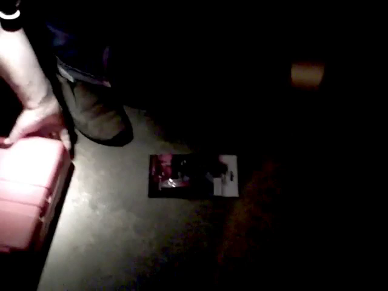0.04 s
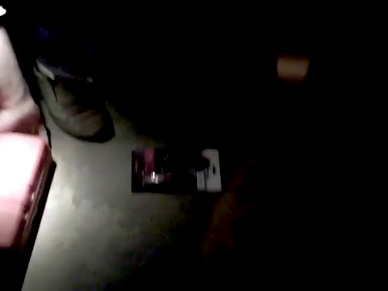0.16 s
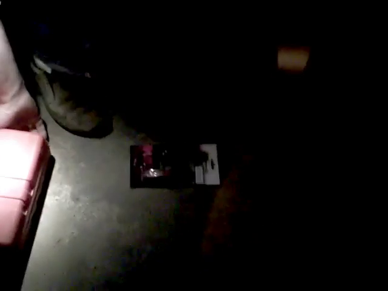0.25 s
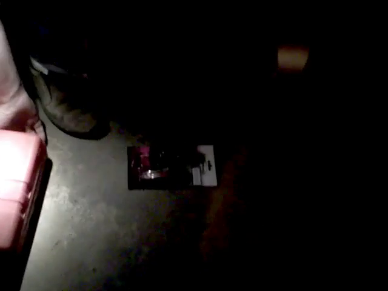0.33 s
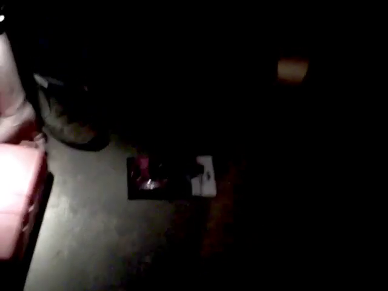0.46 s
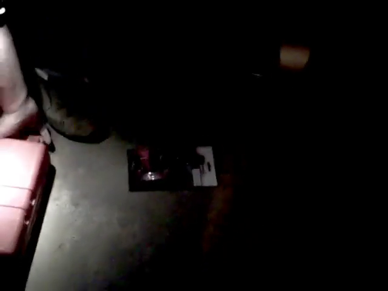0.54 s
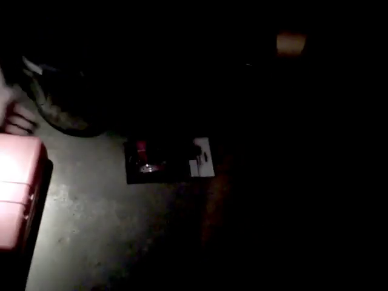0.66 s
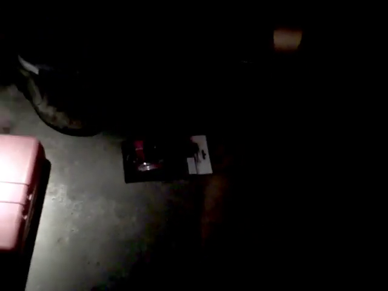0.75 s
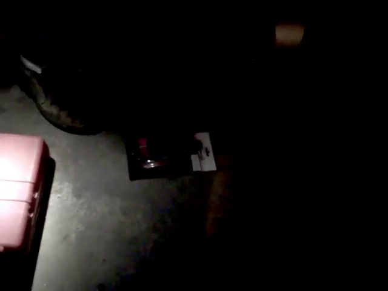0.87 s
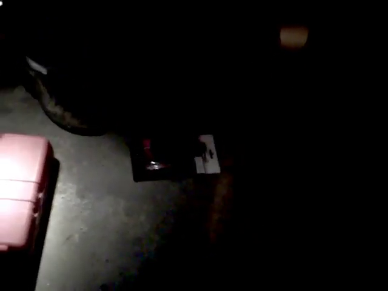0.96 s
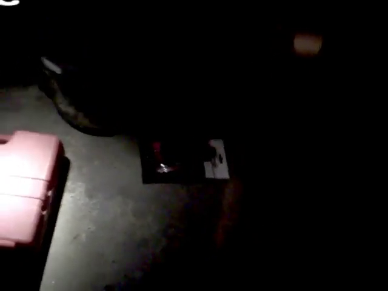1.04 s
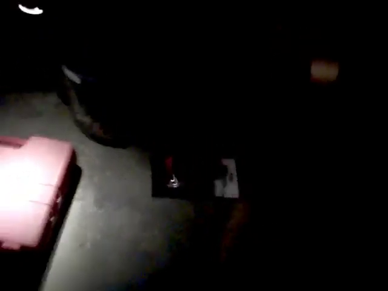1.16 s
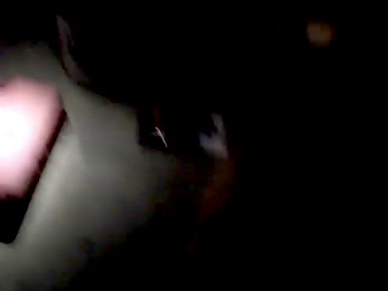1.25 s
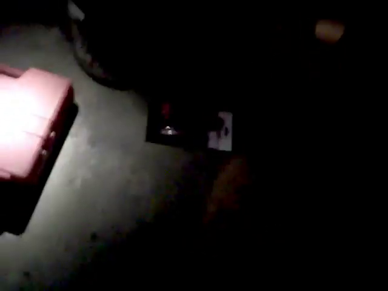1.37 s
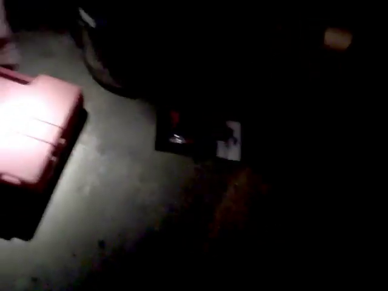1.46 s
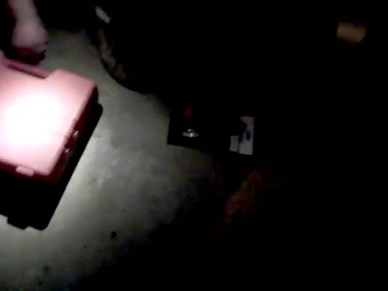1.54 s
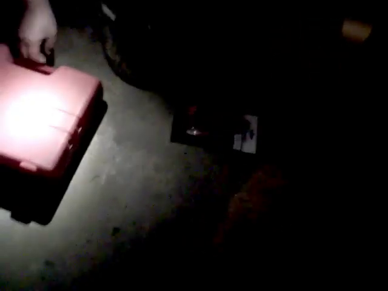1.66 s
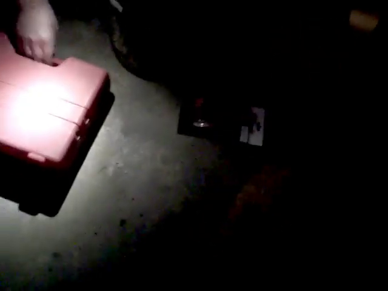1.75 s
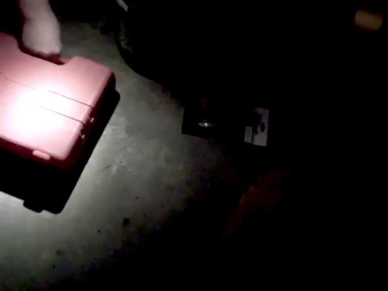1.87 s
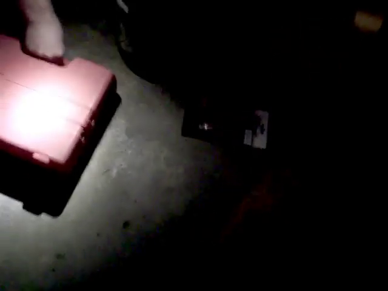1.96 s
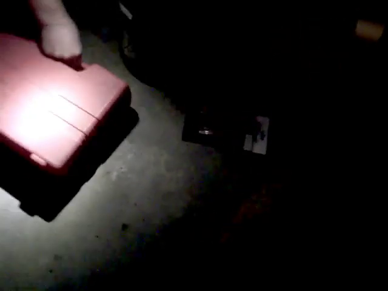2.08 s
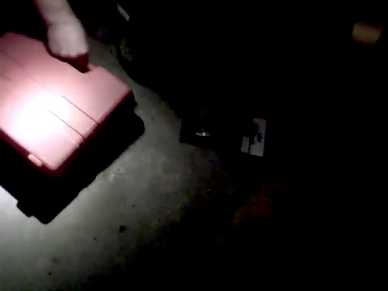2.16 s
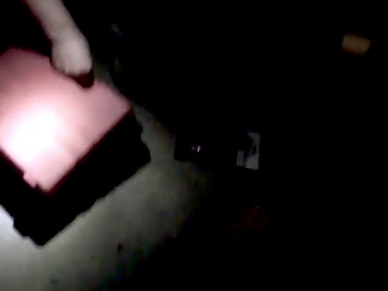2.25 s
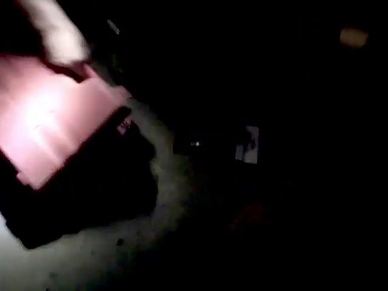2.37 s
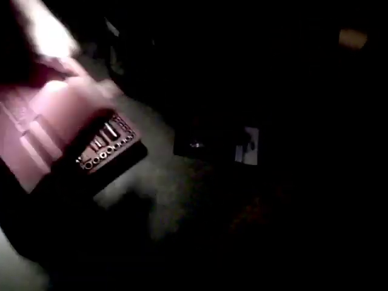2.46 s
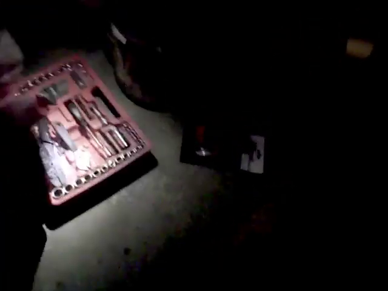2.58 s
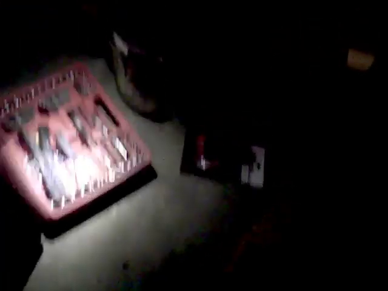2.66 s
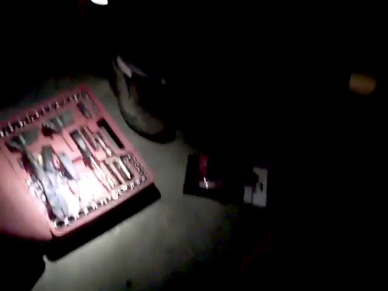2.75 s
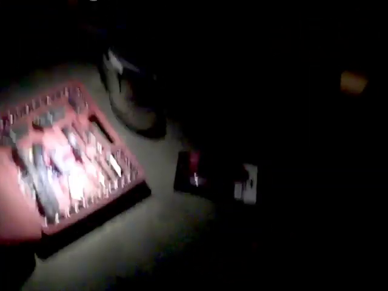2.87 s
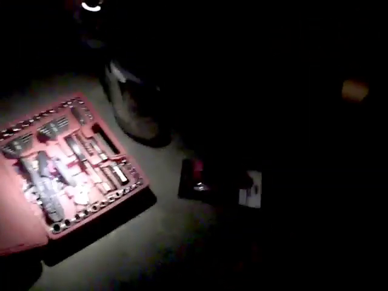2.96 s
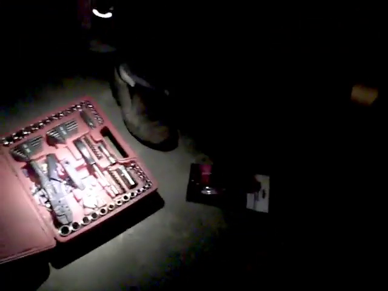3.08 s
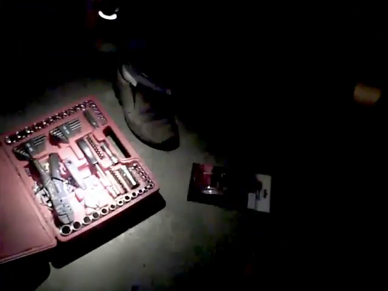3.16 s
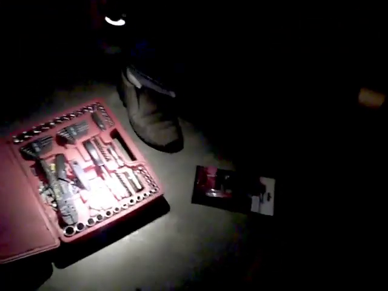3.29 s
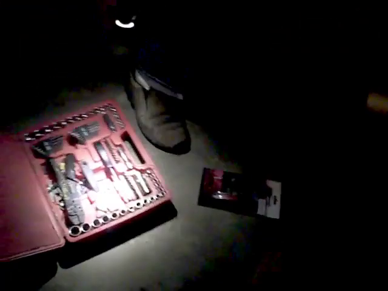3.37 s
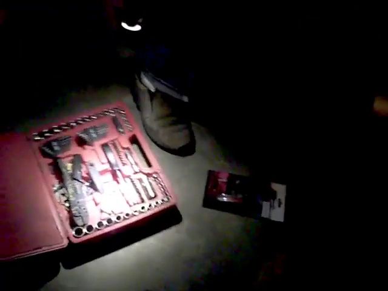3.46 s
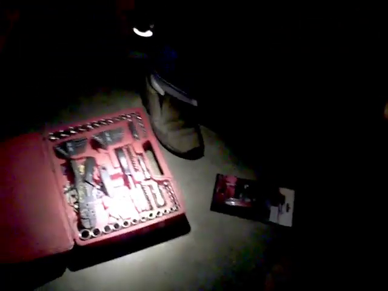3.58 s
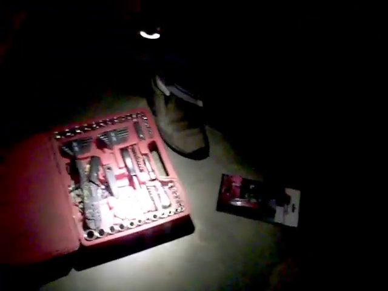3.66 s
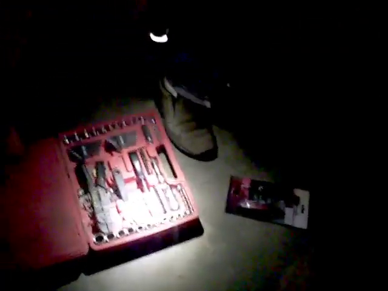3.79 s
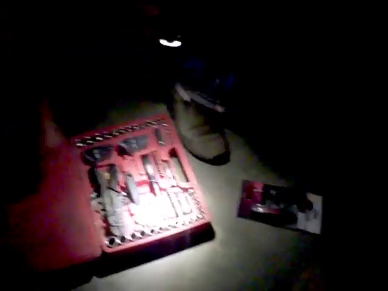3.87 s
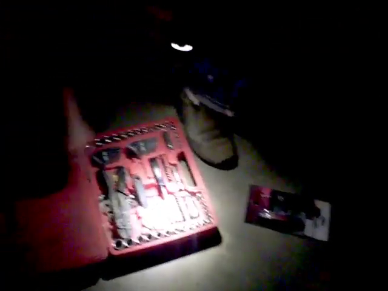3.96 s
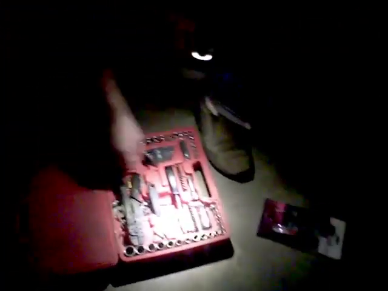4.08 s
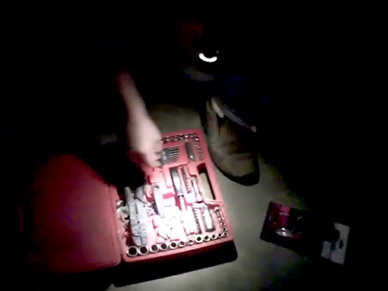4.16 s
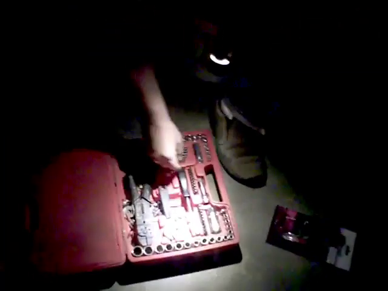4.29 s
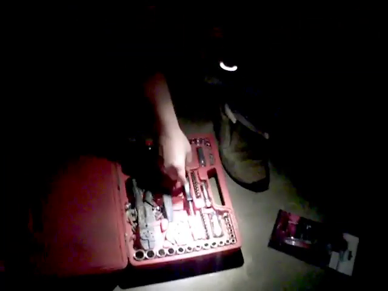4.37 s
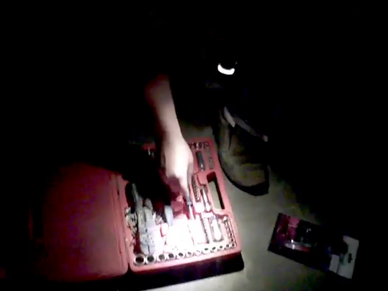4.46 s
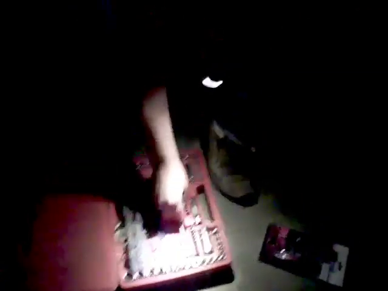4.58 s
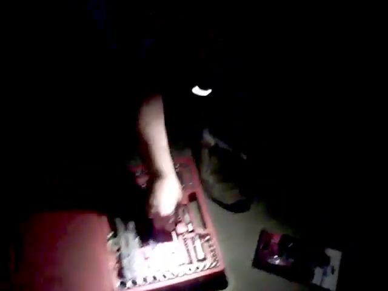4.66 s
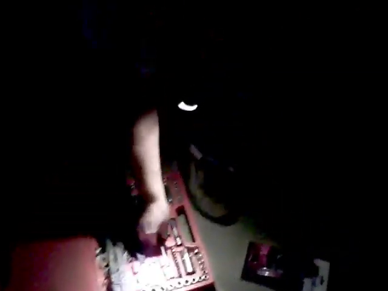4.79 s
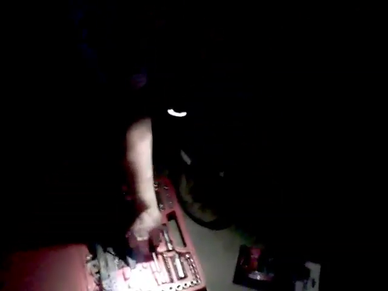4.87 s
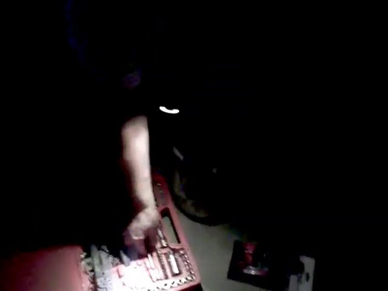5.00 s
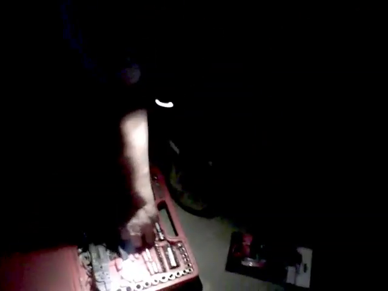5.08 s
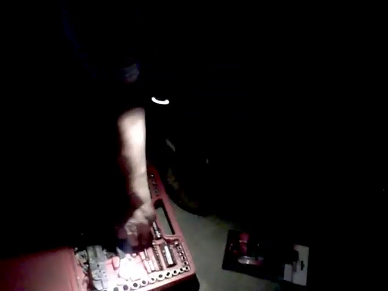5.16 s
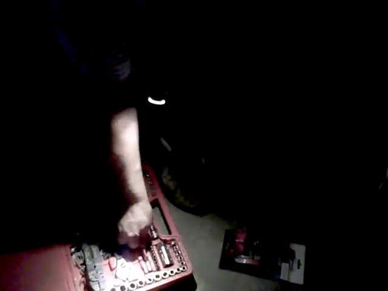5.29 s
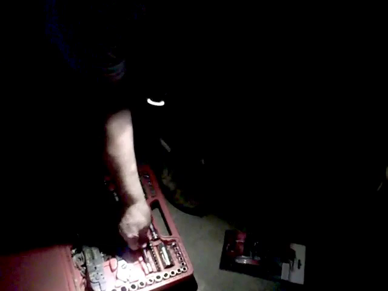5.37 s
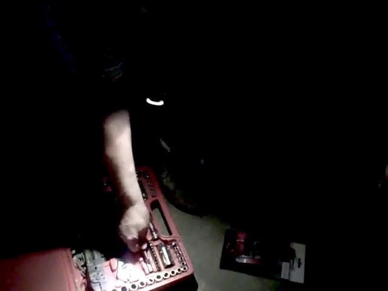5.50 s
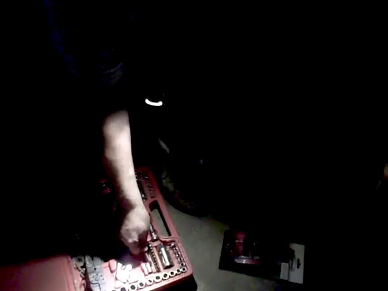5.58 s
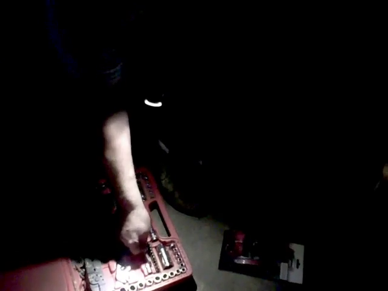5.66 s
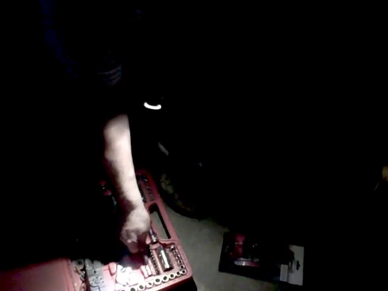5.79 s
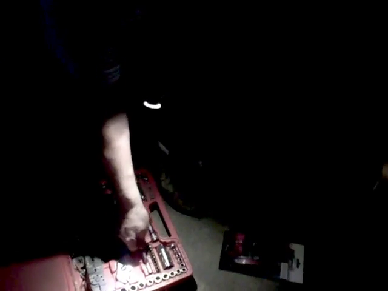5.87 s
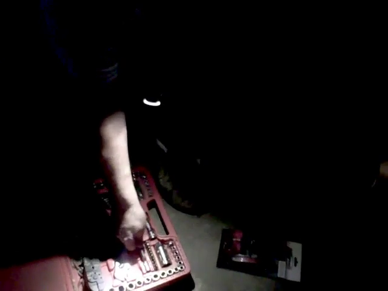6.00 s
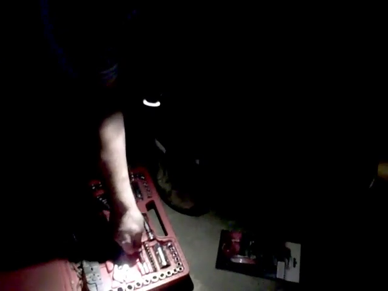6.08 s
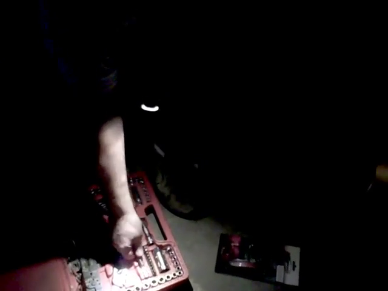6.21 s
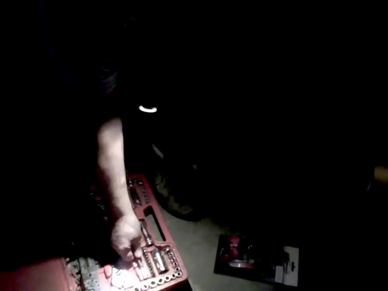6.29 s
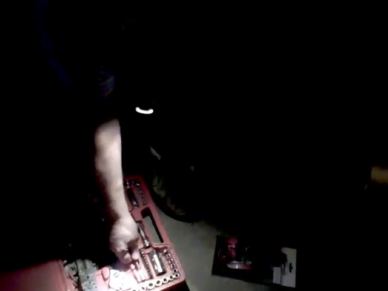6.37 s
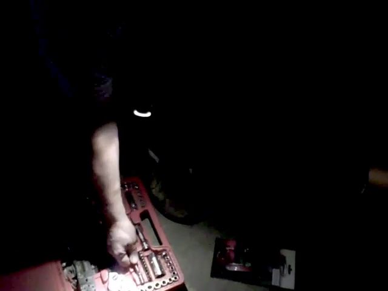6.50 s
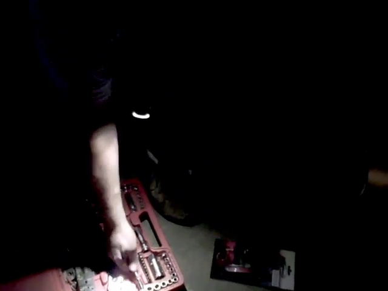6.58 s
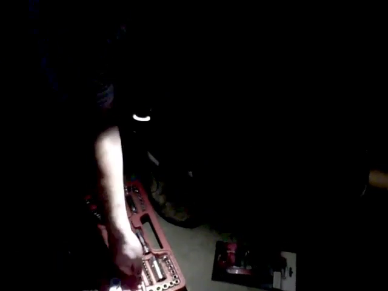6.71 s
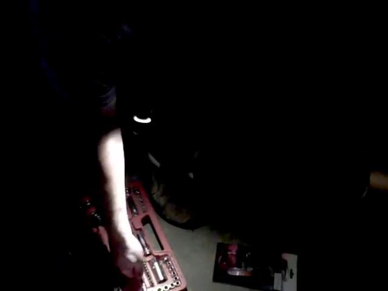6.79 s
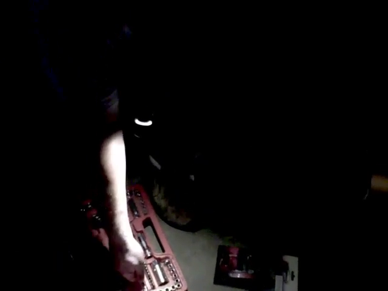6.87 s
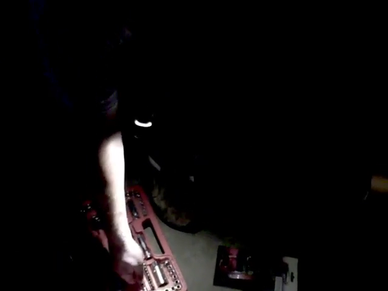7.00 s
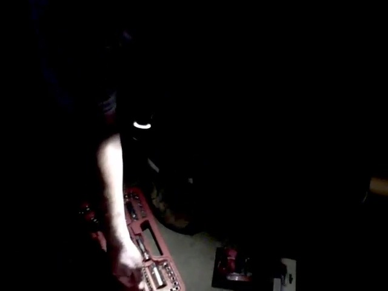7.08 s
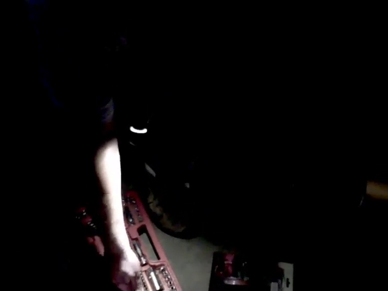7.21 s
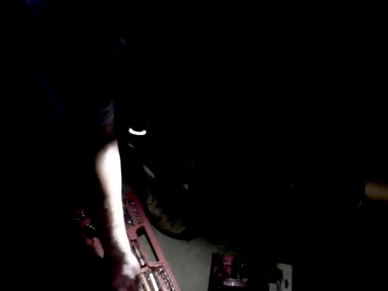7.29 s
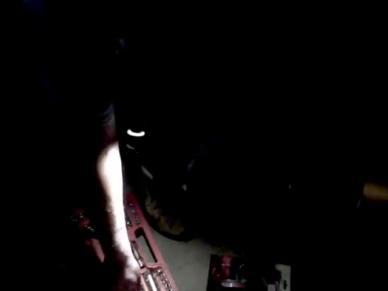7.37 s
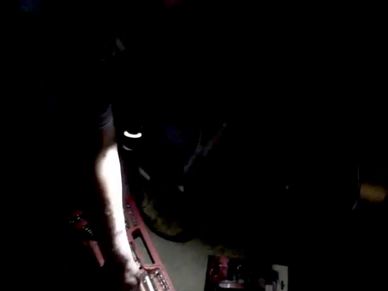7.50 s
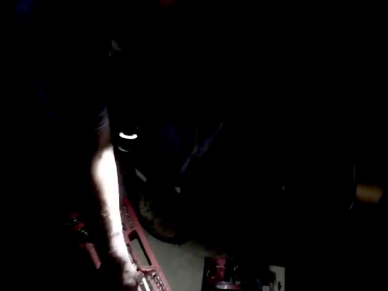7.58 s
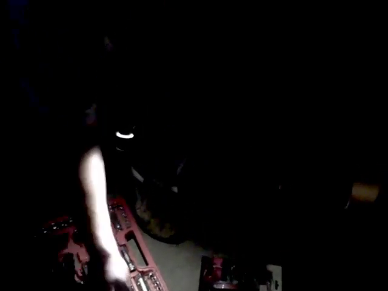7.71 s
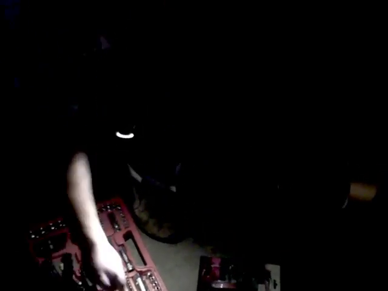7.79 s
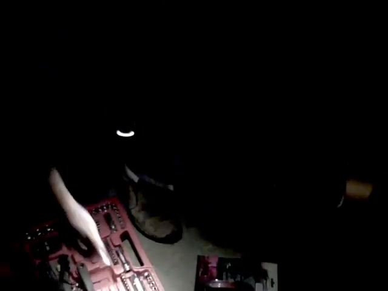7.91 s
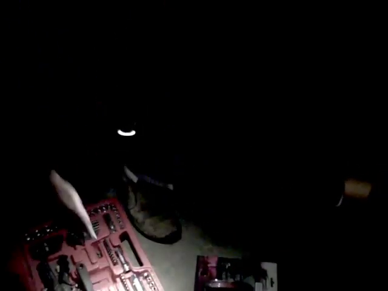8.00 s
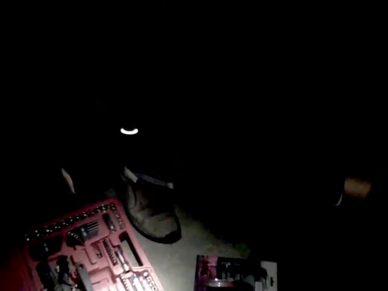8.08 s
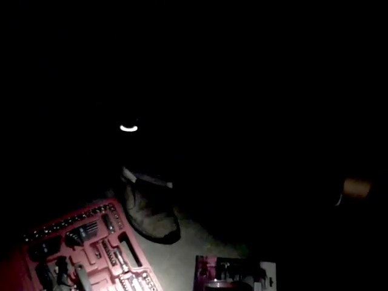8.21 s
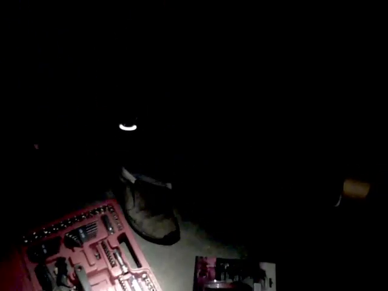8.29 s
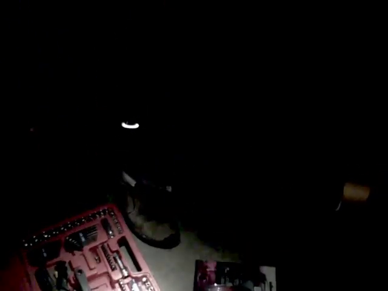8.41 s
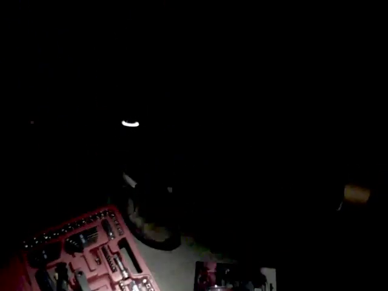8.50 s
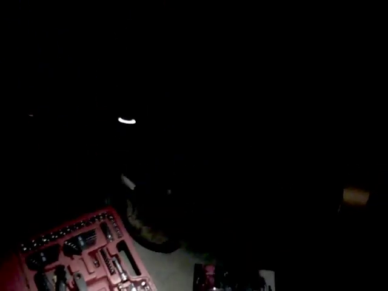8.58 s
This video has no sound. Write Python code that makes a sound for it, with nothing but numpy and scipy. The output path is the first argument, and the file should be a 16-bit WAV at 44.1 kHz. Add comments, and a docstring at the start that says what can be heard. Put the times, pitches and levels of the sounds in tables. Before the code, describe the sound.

A quiet bare garage with faint steady air noise and a short diffuse echo. Soft rubbing and tiny taps open the scene, then at about 0.5 s a hollow plastic case lands with a loud, rattling double bang. Around 1.1-1.4 s come dry close finger taps, one prominent at 1.28 s, and gritty latch clicks. At 2.0 s the case is shoved over concrete with a scrape and jingling sockets; a second short shove leads into a clattering crash at 2.25-2.35 s. A sharp plastic snap follows at 2.6 s, a stuttering hinge creak at 2.8-3.0 s, then sleeve rustle, and the lid slams with a deep, loud bang near 3.7 s. It becomes much quieter; from 5.1 to 7.8 s light, irregular clacks and faint steel clinks mark tools being worked from plastic seats. The end is almost silent.

```python
"""Bare garage: a blow-moulded socket case is unlatched, dragged round on concrete and dropped open.
The lid creaks over and slams, tools rattling inside; then a hand pries steel tools from plastic seats.
Sleeves rustle and fingers tap close by.
Blows: grain bursts through shell resonances. Steel: damped modes. Creak: stick-slip impulses.
Friction: filtered grains under gain curves. A diffuse decaying noise tail is the room."""
import sys
import numpy as np
from scipy import signal
from scipy.fft import rfft, irfft, next_fast_len
from scipy.io import wavfile
from scipy.ndimage import uniform_filter1d

SR = 44100
rng = np.random.default_rng(int(sys.argv[2]) if len(sys.argv) > 2 else 0)


def persist_wave(psi):
    """Save psi, clipped to +-1, as 16-bit WAV."""
    counts = np.round(np.clip(psi, -1, 1) * 32767).astype(np.int16)
    wavfile.write(sys.argv[1], SR, np.atleast_2d(counts).T)


N = 381465
TIME = np.arange(N) / SR
AFTER = np.arange(SR // 4) / SR  # s since a contact


# case or lid lands on the floor: [t/s, level/dB, thump/dB, crack/dB, spot f/Hz, rattle t60/s]
SLAMS = [(0.515, -13.5, -16, -10, 1159, 0.084), (0.550, -9, -18, -20.5, 790, 0.027),
         (2.253, -7.5, -21.5, -8, 1505, 0.06), (2.295, -14.5, -22, -13.5, 1300, 0.4),
         (2.357, -13.5, -11.5, -18, 881, 0.042), (3.673, -8, -4, -5.5, 430, 0.067),
         (3.697, -11.5, -8.5, -18.5, 470, 0.12), (3.735, -8, -24, -11, 1773, 0.069)]
FAR_EDGE_S, FAR_EDGE_DB, FAR_EDGE_THUMP_DB = .0105, -2.5, 0.5  # lands later, weaker, heavier


def slams():
    """The case lands on one edge, then the other, and its sockets chatter in their seats."""
    edges = [(0, 0, 0), (FAR_EDGE_S, FAR_EDGE_DB, FAR_EDGE_THUMP_DB)]
    out = np.zeros(N)
    for s, db, thump_db, crack_db, spot_hz, t60 in SLAMS:
        for late_s, edge_db, heavier_db in edges:
            force = grains(len(AFTER), 12000, 2) * fade(t60) * (1 - fade(0.0095))
            hit = blow(force, thump_db + heavier_db, crack_db, spot_hz, wet_db=-4.0)
            add(out, s + late_s, amp(db + edge_db) * hit)
    return out


# latches, lid, case corners: [t/s, level/dB, thump/dB, crack/dB, spot f/Hz, chatter t60/s]
KNOCKS = [(0.461, -31, 0, -12.5, 540, .06), (0.477, -28.5, -12, -13.5, 860, .13),
          (1.32, -42, -11, -1.5, 1610, .06), (1.361, -25, -33, -16, 930, .022),
          (1.368, -27.5, -20, -22, 930, .02), (1.49, -40.5, 1.5, -5.5, 567, .03),
          (1.75, -30.5, -28, -13.5, 790, .04), (1.906, -31, -18, -11, 746, .045),
          (1.973, -40, 1.5, 2, 790, .035), (2.0, -50, 7, 9, 515, .02), (2.194, -24, -32, -7.5, 890, .04),
          (2.207, -25, -23, -2, 915, .045), (2.549, -24.5, -19, -13.5, 500, .07),
          (2.578, -31.5, -14, 1.5, 1440, .045), (2.648, -36, -8, 4, 1820, .046),
          (3.664, -23.5, -3.5, -13, 1090, .056), (4.154, -50.5, 1.5, -33, 480, 0.082)]


def knocks():
    """Short gritty contacts of the plastic parts, with an onset of a few ms at most."""
    out = np.zeros(N)
    bite = 1 - fade(.004)
    for s, db, thump_db, crack_db, spot_hz, t60 in KNOCKS:
        force = grains(len(AFTER), 7000, 2.5) * fade(t60) * bite
        add(out, s, amp(db) * blow(force, thump_db, crack_db, spot_hz, wet_db=-0.44))
    return out


# tools in and out of their seats: [t/s, level/dB, thump/dB, crack/dB, seat f/Hz]
CLACKS = [(5.145, -38.5, -4, -6.5, 1990), (5.186, -29, -31, -12, 1900), (5.213, -33, -13, -14.5, 697),
          (5.239, -38, -23, -5, 1610), (5.292, -40.5, -8.5, -23, 1030), (5.53, -46, -3, -7.5, 640),
          (5.977, -39, -21, 5, 2520), (6.105, -44, -10, -3, 1403), (6.148, -53, 5.5, -15, 353),
          (6.551, -44.5, -7.5, -17, 1030), (6.656, -38, -28, -9, 680), (6.667, -34.5, -23.5, -17.5, 640),
          (6.701, -41, -9, -5.5, 640), (6.727, -28.5, -20, -20.5, 1060), (6.899, -39.5, -15.5, -21, 664),
          (6.916, -44, -14, -3.5, 1020), (7.08, -41, -19, -18, 884), (7.634, -48, -9.5, -13, 657),
          (7.67, -46.5, -21.5, -11, 894), (7.701, -38, -13, -29, 1080), (7.752, -48.5, -12, -20.5, 829)]
# modes of a hand-damped steel tool: [f/Hz, level/dB, t60/s]
TOOL_MODES = [(2280, 0.5, 0.016), (3068, 0.5, .012), (5300, 9.5, 0.0074), (6850, 3, 0.0091)]
CLACK_T60_S = 0.046
TOOL_RING_DB = -0.5  # re crack
TOOL_SPREAD = 0.0866  # std of log pitch


def clacks():
    """A tool strikes its plastic seat; the steel rings more the stronger the crack."""
    out = np.zeros(N)
    bite = 1 - fade(.004)
    for s, db, thump_db, crack_db, spot_hz in CLACKS:
        force = grains(len(AFTER), 5000, 2.3) * fade(CLACK_T60_S) * bite
        pitch = np.exp(TOOL_SPREAD * rng.standard_normal())
        steel = steel_ring([(pitch * hz, level, t60) for hz, level, t60 in TOOL_MODES])
        add(out, s, amp(db) * blow(force, thump_db, crack_db, spot_hz, wet_db=-3))
        add(out, s, amp(db + crack_db + TOOL_RING_DB) * garage(steel, wet_db=-2))
    return out


# plastic spectrum: [f/Hz, level/dB]
PLASTIC = [(25, -27.5), (90, -36.5), (130, -21.5), (175, -9), (255, -1.5), (400, -4), (800, 0),
           (1700, -5.5), (3100, -9), (4000, -9.5), (6000, -11.5), (9000, -21.5), (12500, -33),
           (16000, -32.5)]
# resonances of the hollow case: [f/Hz, width/Hz, gain/dB]
SHELL = [(180, 27, 8.5), (308.3, 40, 10.5), (373, 27, 5), (431, 24, 6.5), (490, 15, 6), (542, 26, 4.5),
         (680, 24, 5.5), (817, 12, 7), (934, 11, 5.5), (1030, 28, 6), (1165, 32, 5), (1390, 9.8, 7.5),
         (1613, 110, 4.5), (1890, 35, 6)]


def blow(force, thump_db, crack_db, spot_hz, wet_db):
    """A brief force shakes shell and room; thump and crack levels are relative to the body."""
    heard = amp(wet_db) * np.linalg.norm(force) * tail()
    add(heard, 0, force)
    spot = (spot_hz, spot_hz / 2, 4)  # broad local resonance
    shell = coloured(heard, PLASTIC, SHELL + [spot])
    thump = crest(band(shell, 480, "low"))
    body = crest(band(shell, [430, 2900], "band"))
    crack = crest(band(shell, 2600, "high"))
    return amp(thump_db) * thump - body + amp(crack_db) * crack


# lid turns on its stiff hinge: [t/s, level/dB before trim, length/s]
TURNS = [(2.83, -27, .195), (3.148, -37.5, .06)]
# hardest hinge jerks: [t/s, level/dB before trim]
SLIPS = [(2.798, -30), (2.826, -25.5), (2.845, -17), (2.904, -14.5), (2.919, -18.5), (2.959, -22),
         (2.989, -20.5), (3.012, -21)]
# hinge spectrum: [f/Hz, level/dB]
HINGE = [(60, -62), (150, -39.5), (260, -22.5), (370, -3), (800, -1), (1250, -7), (1900, -16.5),
         (3000, -29.5), (7000, -40.5), (16000, -57.5)]
TURN_ATTACK_S, TURN_RELEASE_S = .07, 0.17  # linear rise; fall by 60 dB


def creak():
    """Stick and slip in the plastic: a few hard jerks among many fine, uneven ones."""
    level = pushes(TURNS, TURN_ATTACK_S, TURN_RELEASE_S)
    wander_db = 3 * np.repeat(rng.standard_normal(N // 256 + 1), 256)[:N]
    cycles = np.cumsum(130 * amp(wander_db)) / SR  # nominal 130 jerks/s
    jerks = np.diff(np.floor(cycles), prepend=0)
    fine = jerks * amp(3.06 * rng.standard_normal(N))
    out = amp(-7.5) * level * unit(coloured(fine, HINGE))
    impulse = 1. * (AFTER == 0)
    for s, db in SLIPS:
        spot = (750 * amp(3.3 * rng.standard_normal()), 400, 4)  # each slip bends another part of the lid
        add(out, s + 0.001, amp(db - 11) * crest(coloured(impulse, HINGE, [spot])))
    return garage(out, wet_db=0)[:N]


# case shoved round on the floor: [t/s, level/dB before trim, length/s]
SHOVES = [(1.998, -29.5, .135), (2.2, -27, .05)]
# spectrum into the shell: [f/Hz, level/dB]
SCRAPE = [(59, -75.5), (100, -33.5), (192, -12), (345, -13.5), (386, -15), (703, 0), (975, -6),
          (1160, -9.5), (1280, -8.5), (3000, -13), (3900, -45), (6600, -120)]
# grit spectrum: [f/Hz, level/dB]
GRIT = [(1470, -35), (2500, -5), (3600, -4), (4370, 3.5), (5440, -2.5), (8730, -9.5), (11400, -24),
        (16000, -30)]
GRIT_ATTACK_S, SHELL_ATTACK_S, SHOVE_RELEASE_S = .004, .04, .35  # release: 60 dB


def drag():
    """Each shove grinds the case over gritty concrete, which also drives its shell."""
    shell_gain = pushes(SHOVES, SHELL_ATTACK_S, SHOVE_RELEASE_S)
    grit_gain = pushes(SHOVES, GRIT_ATTACK_S, SHOVE_RELEASE_S)
    catch_db = 3 * unit(uniform_filter1d(rng.standard_normal(N), size=350))  # grit catches and lets go
    low = shell_gain * unit(coloured(grains(N, 2500, 1.3), SCRAPE, SHELL))
    high = grit_gain * amp(catch_db) * unit(coloured(grains(N, 1400, 3), GRIT))
    return garage(amp(-1.5) * low + amp(-8.0) * high, wet_db=-2.5)[:N]


# sharp plastic clicks of catches and hinge: [t/s, level/dB before trim]
SNAPS = [(1.753, -49.5), (1.973, -42), (2.000, -39), (2.21, -29), (2.579, -16.5), (2.647, -30),
         (2.657, -32), (2.847, -44.5), (2.905, -46.5), (2.99, -43.5), (3.101, -51), (3.198, -49.5),
         (5.076, -50.5)]
# click spectrum: [f/Hz, level/dB]
SNAP_SPECTRUM = [(530, -25.5), (900, -2.5), (1070, -13), (1510, -2), (1950, -12), (2140, -2.5),
                 (2300, -4.5), (4680, -9), (6720, -8.5), (10100, -13.5), (16000, -34.5)]


def snaps():
    """Stiff plastic snaps free at once, so its click reaches far into the treble."""
    out = np.zeros(N)
    for s, db in SNAPS:
        click = crest(coloured(rng.standard_normal(len(AFTER)) * fade(.035), SNAP_SPECTRUM))
        add(out, s, amp(db - 1.5) * garage(click, wet_db=-3))
    return out


# steel touches steel: [t/s, level/dB before trim, reference f/Hz]
CLINKS = [(2.001, -28.5, 6470), (2.038, -25, 5300), (2.209, -26.5, 6200), (2.227, -28, 5800),
          (5.772, -38.5, 5230), (6.620, -49.5, 6500), (6.657, -50, 6730), (7.101, -48.5, 5910)]


def clinks():
    """Sockets ring briefly, damped by their seats, which click along."""
    out = np.zeros(N)
    for s, db, pitch_hz in CLINKS:
        steel = socket_ring(pitch_hz)
        seat = crest(coloured(rng.standard_normal(len(AFTER)) * fade(.04), PLASTIC, SHELL))
        add(out, s, amp(db - 4.5) * garage(steel + amp(-1.5) * seat, wet_db=-2.5))
    return out


# socket modes: [ratio to reference f, level/dB, t60/s]
STEEL_MODES = [(0.6, -2.5, .02), (.98, 0, 0.035), (0.999, 2.5, .035), (1.02, 1, .03), (1.44, -4.5, .025),
               (1.59, -9, .02), (1.95, -13, .015)]


def socket_ring(pitch_hz):
    """Steel socket: modes at fixed ratios to its reference pitch."""
    return steel_ring([(ratio * pitch_hz, level, t60) for ratio, level, t60 in STEEL_MODES])


STEEL_LOW_HZ = 890


def steel_ring(modes):
    """A struck steel part, heard only above about 900 Hz, with no bass."""
    return crest(band(ring(modes), STEEL_LOW_HZ, "high", order=2))


JINGLE_PER_S, JINGLE_HZ = 130, 5700
JINGLE_SPREAD, JINGLE_DB = .22, -2.5  # half range of log pitch; loudest hit re shove level


def jingle():
    """Sockets of many sizes chatter at random while the case is shoved."""
    out = np.zeros(N)
    for s, db, length_s in SHOVES:
        for when, size, softness in rng.random((int(length_s * JINGLE_PER_S), 3)):
            pitch_hz = JINGLE_HZ * np.exp(JINGLE_SPREAD * (2 * size - 1))
            hit_db = db + JINGLE_DB - 6.4 * softness
            add(out, s + when * length_s, amp(hit_db) * socket_ring(pitch_hz))
    return garage(out, wet_db=-7.5)[:N]


# small dry taps: [t/s, level/dB before trim, tick/dB re body]
TAPS = [(0.104, -46.5, -14), (0.205, -36.5, -4), (0.453, -38, -11.5), (1.091, -37, -17),
        (1.161, -35.5, -30), (1.194, -37, -4), (1.23, -41.5, 4.5), (1.261, -34, -14), (1.28, -18.5, -18),
        (4.092, -46, -20), (4.694, -46.5, -14), (7.326, -45.5, -22)]
# small plastic body: [f/Hz, level/dB, share of TAP_T60_S]
HOUSING = [(654, 0.5, 0.82), (894, -7.5, 0.74), (1371, -5.5, 0.4)]
TAP_T60_S, TICK_T60_S = .045, .008


def taps():
    """Light finger taps on small plastic, so close that the room adds little."""
    modes = [(hz, level, share * TAP_T60_S) for hz, level, share in HOUSING]
    out = np.zeros(N)
    for s, db, tick_db in TAPS:
        noise = rng.standard_normal(len(AFTER)) * fade(TICK_T60_S)
        tick = crest(band(noise, [900, 5000], "band", order=2))
        body = crest(band(ring(modes), 270, "high", order=4))
        add(out, s, amp(db - 5.0) * garage(body + amp(tick_db) * tick, wet_db=-9))
    return out


# sleeve or palm scuffs the case: [t/s, level/dB before trim, length/s]
SCUFFS = [(0.0, -48, 0.11), (0.11, -45.5, .09), (0.197, -53.5, 0.16), (0.883, -48, .11),
          (0.973, -59.5, 0.2), (1.155, -50, .08), (1.246, -59.5, .12), (1.46, -50, .12), (1.814, -56, .06),
          (2.43, -41.5, .2), (3.161, -44, .14), (3.25, -43, .06), (3.28, -42, 0.5), (6.50, -52, .08)]
# cloth spectrum: [f/Hz, level/dB]
CLOTH = [(1180, -29), (2000, -4.5), (3170, -7), (4190, -4), (4820, -6.5), (5390, -5.5), (8780, -11),
         (16000, -32)]
# hand or tool rubs the shell: [t/s, level/dB before trim, length/s]
RUBS = [(0.0, -44.5, 0.44), (0.507, -17.5, 0.045), (0.6, -44.5, 0.64), (1.19, -39, 0.16),
        (1.55, -50.5, 0.66), (1.78, -53.5, 0.4), (2.25, -23.5, 0.22), (2.55, -43.5, 0.76),
        (3.14, -45, 0.28), (3.3, -39, 0.78), (5.125, -43.5, 0.072), (5.168, -41, 0.039), (6.088, -45, .06),
        (6.69, -53, 0.075), (7.662, -45, 0.087)]
# rub spectrum: [f/Hz, level/dB]
RUB_SPECTRUM = [(59, -61.5), (100, -30), (192, -15.5), (283, -5), (472, -4), (882, -1), (975, 0),
                (1410, 0.5), (1850, -1.5), (3000, -12.5), (3900, -42), (6600, -120)]


def handling():
    """Sleeves brush in uneven strokes; hands and tools rub along the case."""
    cloth = strokes(SCUFFS) * unit(coloured(grains(N, 7300, 3), CLOTH))
    rub = strokes(RUBS) * unit(coloured(grains(N, 2200, 2.3), RUB_SPECTRUM))
    return garage(amp(-1.5) * cloth + amp(-4.0) * rub, wet_db=-4.5)[:N]


# still-air spectrum: [f/Hz, level/dB]
QUIET = [(20, -21), (100, -20), (140, -17), (214, -5), (480, 0), (700, -.5), (1550, -2.5), (2750, -8),
         (4800, -11), (7100, -15), (11000, -21), (16000, -23)]
QUIET_DB = -61  # rms


def still_air():
    """Steady coloured noise of the quiet garage."""
    return amp(QUIET_DB) * unit(coloured(rng.standard_normal(N), QUIET))


# room decay: [f/Hz, t60/s]
GARAGE_T60 = [(150, 0.38), (600, 0.43), (2000, 0.47), (5000, 0.45), (9000, 0.39), (15000, 0.29)]


def tail():
    """A diffuse room answer of energy 1 whose top treble dies first."""
    hz, t, z = signal.stft(rng.standard_normal(SR * 5 // 8), SR, nperseg=256)
    decay_db = -60 * t / along(GARAGE_T60, hz)[:, None]
    x = signal.istft(z * amp(decay_db), SR, nperseg=256)[1]
    x *= 1 - np.exp(-np.arange(len(x)) / SR / 0.0064)  # the walls take a moment to answer
    return x / np.linalg.norm(x)


def garage(x, wet_db):
    """The direct sound plus the room's answer."""
    answer = amp(wet_db) * signal.fftconvolve(x, tail())
    add(answer, 0, x)
    return answer


def grains(count, rate, spread_db):
    """Random tiny contacts of uneven size, rate per second, rms 1."""
    hits = rng.random(count) < rate / SR
    size = rng.standard_normal(count) * amp(spread_db * rng.standard_normal(count))
    return unit(hits * size)


def ring(modes):
    """Damped modes, struck at new strengths each time."""
    out = np.zeros(len(AFTER))
    for hz, db, t60 in modes:
        out += amp(db + rng.normal(0, 2.9)) * fade(t60) * np.sin(2 * np.pi * hz * AFTER)
    return out


def fade(t60):
    """Exponential decay after a contact."""
    return amp(-60 * AFTER / max(t60, .001))


def strokes(rows):
    """Gain of strokes that catch quickly and let go more slowly."""
    gain = np.zeros(N)
    for s, db, length_s in rows:
        phase = np.clip(TIME[:SR] / length_s, 0, 1) ** 0.76
        add(gain, s, amp(db) * np.sin(np.pi * phase))
    return gain


def pushes(rows, attack_s, release_s):
    """Gain of efforts: linear build-up, exponential release once the length is over."""
    gain, t = np.zeros(N), TIME[:SR]
    for s, db, length_s in rows:
        release_db = -60 * np.maximum(t - length_s, 0) / release_s
        add(gain, s, amp(db + release_db) * np.minimum(t / attack_s, 1))
    return gain


def amp(db):
    """Decibels to gain."""
    return 10 ** (np.asarray(db) / 20)


def unit(x):
    """Scale to rms 1."""
    return x / np.sqrt(np.mean(x ** 2) + 1e-20)


def crest(x, size=440):
    """Scale so that the loudest hundredth of a second has rms 1."""
    return x / np.sqrt(uniform_filter1d(x ** 2, size, mode="constant").max() + 1e-20)


def along(points, hz):
    """Read (Hz, value) points on a log axis."""
    f, v = np.transpose(points)
    return np.interp(np.log(hz + 1), np.log(f + 1), v)


def add(track, s, x):
    """Mix x into the track at time s."""
    part = track[max(round(s * SR), 0):][:len(x)]
    part += x[:len(part)]


def coloured(x, spectrum, peaks=()):
    """Minimum-phase filter: smooth spectrum with resonant peaks on top."""
    m = 2 * next_fast_len(len(x) // 2 + 4096)
    hz = np.fft.rfftfreq(m, 1 / SR)
    db = along(spectrum, hz)
    for f, width_hz, gain_db in peaks:
        db = db + gain_db / (1 + (2 * (hz - f) / width_hz) ** 2)
    cepstrum = irfft(np.log(amp(db)))
    cepstrum[1:m // 2] *= 2  # fold to causal
    cepstrum[m // 2 + 1:] = 0
    response = np.exp(rfft(cepstrum))
    return irfft(rfft(x, m) * response)[:len(x)]


def band(x, hz, kind, order=3):
    """Butterworth filter."""
    return signal.sosfilt(signal.butter(order, hz, kind, fs=SR, output="sos"), x)


def scene():
    """All sources over the still air of the garage."""
    blows = slams() + knocks() + clacks() + snaps() + clinks() + taps()
    return (blows + creak() + drag() + jingle() + handling() + still_air())[None]


TOP_HZ = 16300


def record(dry):
    """The microphone saturates smoothly towards +-1; nothing is kept above the band limit."""
    clipped = dry / (1 + np.abs(dry) ** 6) ** (1 / 6)
    m = next_fast_len(N + SR)
    passed = np.fft.rfftfreq(m, 1 / SR) < TOP_HZ
    return irfft(rfft(clipped, m) * passed, m)[:, :N]


dry = scene()
out = record(dry)
persist_wave(out)
```